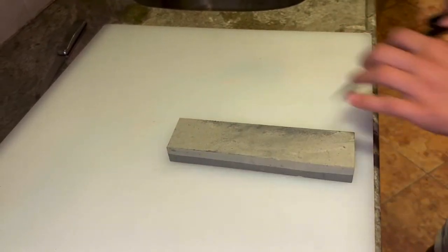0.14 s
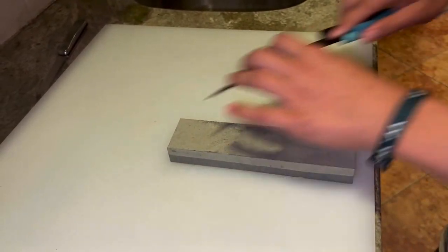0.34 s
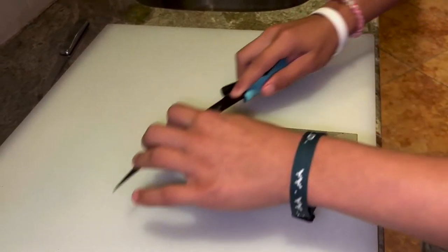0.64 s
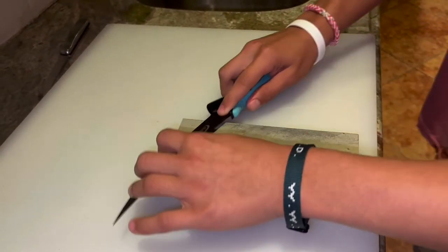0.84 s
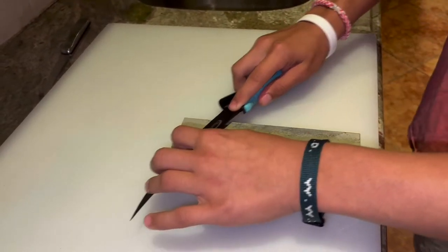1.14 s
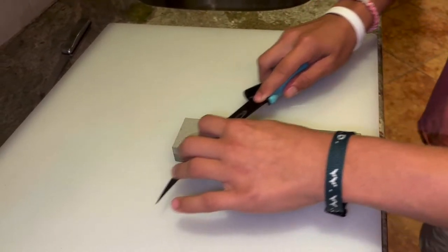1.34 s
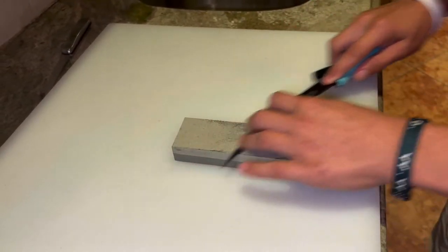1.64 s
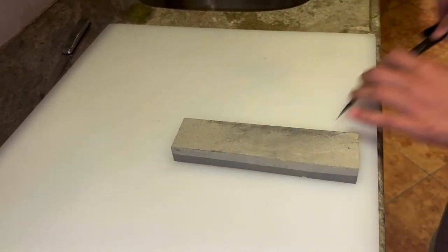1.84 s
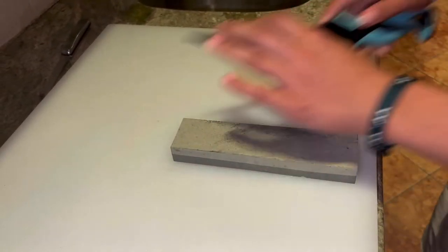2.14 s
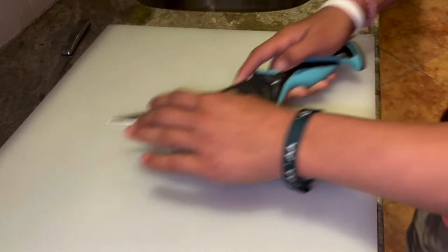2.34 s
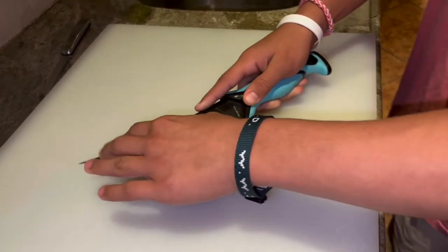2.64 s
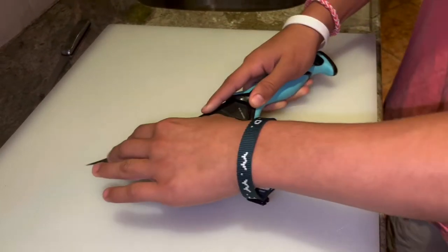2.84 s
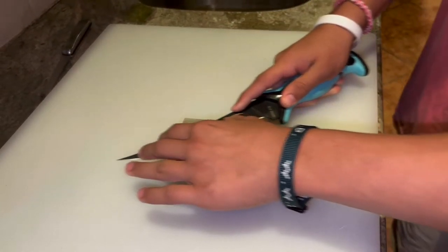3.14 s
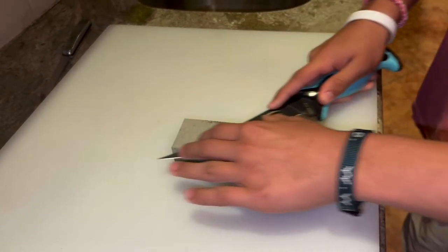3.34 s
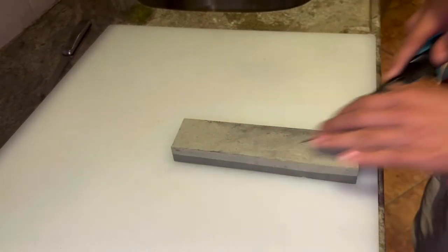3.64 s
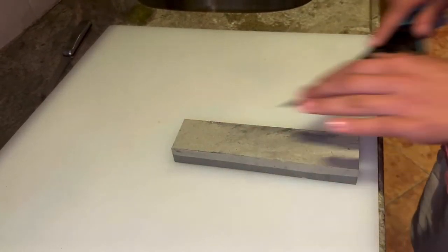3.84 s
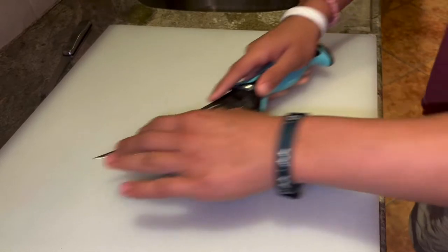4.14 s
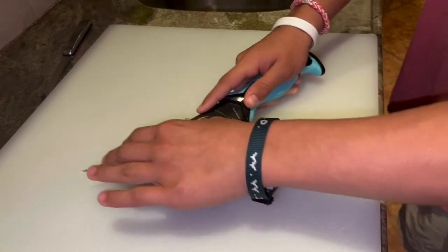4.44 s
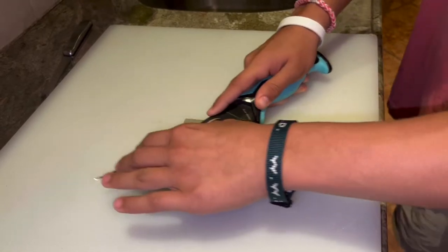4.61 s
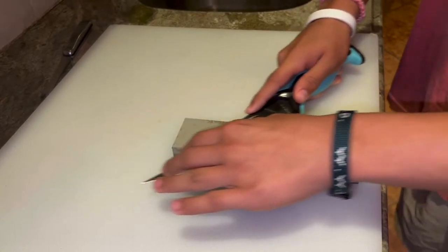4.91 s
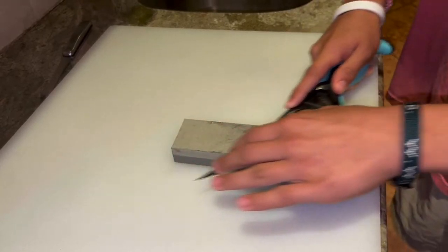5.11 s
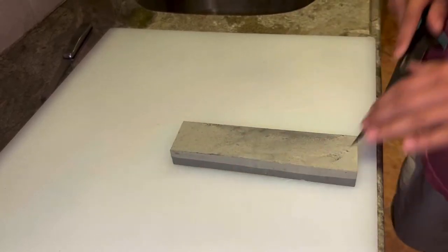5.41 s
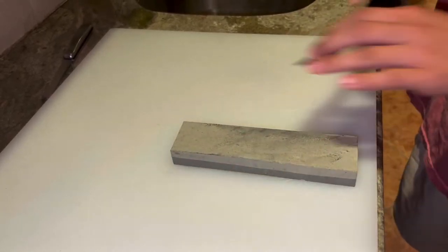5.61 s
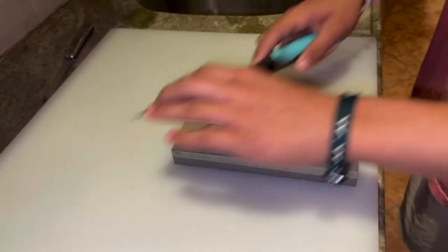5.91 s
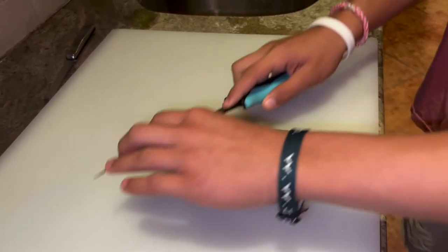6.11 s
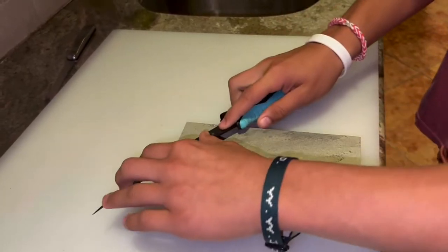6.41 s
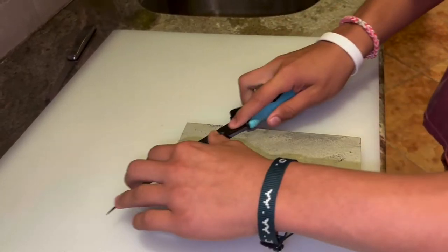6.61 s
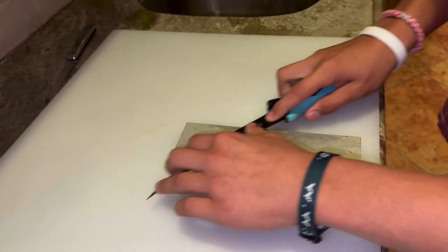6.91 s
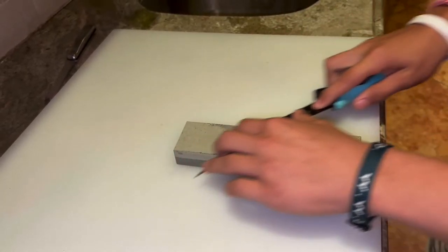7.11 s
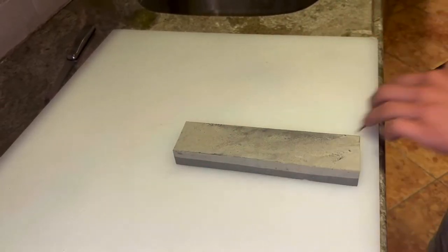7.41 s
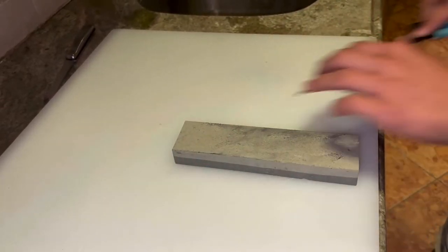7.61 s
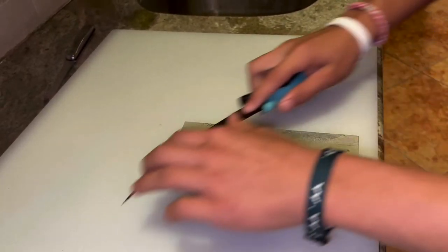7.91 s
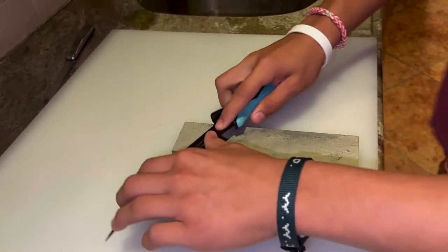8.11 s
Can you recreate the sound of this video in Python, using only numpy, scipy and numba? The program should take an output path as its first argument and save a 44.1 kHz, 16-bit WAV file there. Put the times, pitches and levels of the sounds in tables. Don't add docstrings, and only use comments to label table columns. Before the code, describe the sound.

In a small hard-walled kitchen, a knife is drawn along a sharpening stone, heard close up in stereo. Four bright, gritty scrapes of nearly a second each carry a thin steel ring that climbs in pitch, and most end in a sharp snap. Between them come pauses with faint blade ring, small clicks and cloth movement. A low duct throb and soft air hiss run underneath, and a fifth stroke starts with a strong knock.

```python
import sys
import numpy as np
from scipy import signal
from scipy.fft import rfft, irfft, next_fast_len
from scipy.io import wavfile
from scipy.ndimage import uniform_filter1d, map_coordinates
from numba import njit

SR = 44100
rng = np.random.default_rng(int(sys.argv[2]) if len(sys.argv) > 2 else 0)


def undo_db(level):
    steps = np.asarray(level, float) / 20
    return 10 ** steps


def pcm_store(signal):
    levels = np.round(np.clip(np.atleast_2d(signal), -1, 1) * 32767)
    wavfile.write(sys.argv[1], SR, levels.astype(np.int16).T)


N = 363869


def unit(x):
    return x / np.sqrt(np.mean(x ** 2) + 1e-20)


def along(points, hz):
    f, v = np.transpose(points)
    return np.interp(np.log(hz + 1), np.log(f + 1), v)


def curves(rows):
    s, *cols = np.transpose(rows)
    return [np.interp(np.arange(N) / SR, s, c) for c in cols]


def wobble(rate):
    knots = rng.standard_normal(int(N * rate / SR) + 4)
    return map_coordinates(knots, [np.arange(N) * rate / SR])


def filtered(x, response):
    m = next_fast_len(N + SR // 2)
    return irfft(rfft(x, m) * response(np.fft.rfftfreq(m, 1 / SR)), m)[..., :N]


def coloured(x, spectrum):
    return unit(filtered(x, lambda hz: undo_db(along(spectrum, hz))))


def ringing(x, modes):
    def response(f):
        total = 0
        for k, (centre, width, db) in enumerate(modes):
            damping = 1j * f * width
            total = total + (-1) ** k * undo_db(db) * damping / (centre * centre - f * f + damping)
        return total
    return filtered(x, response)


def spread(mid, side, alike, lead):
    def shares(hz):
        turn = np.arccos(np.clip(along(alike, hz), -1, 1)) / 2
        return np.array([np.cos(turn), np.sin(turn)])

    m, s = filtered(np.array([mid, side]), shares)
    return filtered(np.array([m + s, m - s]), lambda hz: np.exp(.5j * np.outer([1, -1], along(lead, hz))))


# time in seconds, level in dB.
THROB_LEVEL = [(0.0, -33), (0.04, -36.5), (1.63, -38), (1.75, -30.5), (1.86, -36), (2.87, -34), (3.28, -41),
               (3.49, -29), (3.65, -40), (3.77, -31.5), (4.05, -30.5), (5.4, -39.5), (5.54, -28),
               (5.68, -39.5), (6.9, -36), (7.7, -37.5), (8.04, -34.5), (8.25, -37.5)]
# frequency in Hz, strength in dB per Hz.
THROB = [(13, -56.5), (22, -21.5), (24, -15.5), (34, -10.5), (48, 9.5), (62, 10), (71, -2.5), (80, -3),
         (100, -38.5), (180, -120)]
RUMBLE = [(44, -29), (75, -11.5), (86, -5), (135, -4), (153, -12.5), (167, -17), (190, -23.5), (250, -67),
          (420, -120)]
VENT = [(100, -37), (170, -9.5), (242, -2), (275, -8), (305, -6), (382, -11.5), (414, -15), (488, -10),
        (1050, -23), (2380, -34), (2800, -39), (3640, -65), (6160, -120)]
CLOTH = [(1180, -25), (2000, -11), (2390, -2), (2510, -7.5), (3100, -5.5), (4570, -14), (4970, -12),
         (5790, -16), (8040, -14.5), (11800, -23.5), (15000, -28)]
# time in seconds, level in dB, fading in dB per second.
STIR = [(0.0, -65, 96), (.704, -81, 122), (1.8, -77.5, 7.5), (2.28, -86.5, 127), (2.39, -94, 149),
        (3.95, -73, 44), (5.4, -84, 17), (5.51, -81, 153), (5.72, -75, 36.5), (6.26, -88, 47),
        (7.4, -77, 16)]
# frequency in Hz, width in Hz, strength in dB.
WHINE = [(3200, 90, 0), (4900, 110, -3)]
# frequency in Hz, likeness from 0 to 1.
AIR_ALIKE = [(60, 0.2), (130, 0.93), (290, 0.93), (640, 0.4), (1410, 0.38), (3100, 0.21), (6820, 0.14),
             (15000, 0.12)]
# frequency in Hz, lead in radians.
AIR_LEAD = [(430, 0), (950, -1.2), (1640, 0), (4000, -.3), (5200, -1.3)]


def ventilation():
    noise = rng.standard_normal((6, N))
    hum_hz = 58.5 + 2.5 * wobble(4)
    hum = np.sqrt(2) * np.sin(2 * np.pi * np.cumsum(hum_hz) / SR)
    throb = undo_db(curves(THROB_LEVEL)[0]) * unit(coloured(noise[0], THROB) + undo_db(-2) * hum)
    rumble = undo_db(-41.5 + .8 * wobble(3.5)) * coloured(noise[1], RUMBLE)
    t = np.arange(N) / SR
    stir = undo_db(-80.5) + sum(undo_db(db - fade * np.abs(t - s)) for s, db, fade in STIR)
    pair = []
    for air, cloth in (noise[2:4], noise[4:]):
        rush = undo_db(-53.5 + 0.42 * wobble(1.8)) * coloured(air, VENT)
        pair.append(rush + stir * coloured(cloth, CLOTH))
    whine = ringing(ringing(rng.standard_normal(N), WHINE), WHINE)
    pair[0] = pair[0] + undo_db(-84.0) * unit(whine)
    left_db = 1.5
    balance = undo_db([[left_db / 2], [-left_db / 2]])
    return throb + rumble + balance * spread(*pair, AIR_ALIKE, AIR_LEAD)


# time in seconds, pitch in Hz, level in dB, seconds to die by 60 dB.
BUMPS = [
    (.71, 269, -26.5, 0.019),
    (4.409, 180, -37, 0.16),
    (4.408, 1113, -41, .03),
    (6.438, 220, -45.5, .06),
    (8.129, 140.7, -41, 0.074),
    (8.195, 192, -18, 0.039),
]
# time in seconds, pitch in Hz, level in dB, seconds to die by 60 dB.
HUMS = [(0, 4500, -64, 1.5), (1.65, 3350, -56, .6), (1.86, 4840, -73, .9), (3.57, 3400, -63, .7),
        (3.8, 2416, -70, 1.2), (3.93, 5000, -77, .5), (5.29, 3550, -63, .6), (5.5, 4880, -69, .5),
        (5.5, 9300, -72, .15), (5.68, 3300, -72, 1), (5.8, 4900, -76, 1)]


def lifted():
    out, t = np.zeros(N + SR), np.arange(SR // 2) / SR
    for s, hz, db, t60 in BUMPS + HUMS:
        drift = hz / 25000.0 * np.cumsum(rng.standard_normal(len(t)))
        swell = 1 - np.exp(-t / 0.0013)
        tone = np.sin(2 * np.pi * hz * t + drift)
        out[round(s * SR):][:len(t)] += undo_db(db - 60 * t / t60) * swell * tone
    return out[:N]


# time in seconds, peak in dB.
HANDLING = [(.341, -56.5), (4.295, -64), (7.684, -62), (5.565, -60.5), (6.3326, -49), (2.1096, -56.5),
            (2.2687, -55.5), (2.3292, -62), (2.387, -59), (5.4999, -61), (5.718, -61), (6.2625, -53.5),
            (6.3062, -73)]
# time in seconds, peak in dB, ring in Hz.
TOUCHES = [(0.7116, -41.5, 5690), (0.815, -62, 3600), (0.9894, -44, 7820), (4.3287, -38, 3600),
           (6.3445, -44.5, 3300), (6.366, -38.5, 3400), (6.3989, -43.5, 3245), (6.4154, -39, 5470),
           (6.4444, -33, 1780), (6.4862, -37.5, 9900), (8.0542, -34.5, 3610), (8.057, -30, 2150),
           (8.1081, -32, 3685), (8.1528, -29, 3600), (8.1672, -40, 5610), (8.1828, -23.5, 6625),
           (8.1937, -28, 3646)]
# time in seconds, peak in dB, ring in Hz.
SNAPS = [(0.926, -36, 7520), (1.428, -18.5, 9160), (1.4278, -20, 8050), (1.174, -27, 4620),
         (1.3284, -25, 7780), (1.491, -28.5, 9210), (1.6427, -6.5, 10890), (1.6465, -12.5, 14100),
         (2.6678, -34.5, 11590), (3.3396, -24.5, 8000), (4.6366, -28.5, 7226), (5.005, -21.5, 9980),
         (6.6868, -26, 10650), (6.866, -26, 10000), (7.071, -27.5, 10220), (2.636, -34, 4420),
         (2.6468, -25.5, 4250), (2.6812, -25.5, 8650), (2.6862, -20.5, 4634), (4.3416, -46, 4150),
         (4.393, -47, 2800), (6.746, -23, 8240), (1.618, -21, 4542), (2.7188, -14.5, 6420),
         (2.7205, -20.5, 10600), (2.8052, -18, 6200), (3.272, -20.5, 6690), (3.284, -24.5, 3600),
         (3.5596, -39, 3300), (4.408, -22, 3480), (4.5426, -28, 3180), (4.8789, -20, 6820),
         (4.949, -15.5, 7630), (4.969, -25.5, 7290), (5.032, -16, 8240), (5.27, -34.5, 9470),
         (6.715, -19, 8240), (7.2245, -12, 5300), (7.2262, -10, 6310), (7.2265, -16, 14300),
         (8.132, -23.5, 3620)]


def contacts():
    snaps = [(*row, -36.5) for row in SNAPS]
    touches = [(*row, -0.5) for row in TOUCHES]
    return snaps + touches + [(*row, 3430, -15.5) for row in HANDLING]


# pitch in Hz, strength in dB, seconds to die by 60 dB.
CHORD = [(1740, -12, 0.041), (2438, -6.5, 0.028), (2780, -10.5, 0.043), (3480, -5, 0.03),
         (4150, -9.5, 0.082), (5550, -7.5, 0.062), (6390, -4, 0.045), (8860, -9, .04)]
# pitch in Hz, strength in dB.
KNOCK = [(720, -6), (980, -1.5), (1350, -6.5)]


def ticks():
    out, t = np.zeros(N + SR), np.arange(SR // 10) / SR

    def tone(hz, shake, noise):
        return np.sin(2 * np.pi * hz * t + shake * np.cumsum(noise))

    for s, db, hz, knock_db in contacts():
        noise = rng.standard_normal((3, len(t)))
        dull = np.clip(.35 - (db + 12.5) / 55, 0, 1)
        swell = 1 - np.exp(-t / 0.00052)
        burst = noise[0] - np.clip(.6 - dull, 0, 1) * np.roll(noise[0], 1)
        fading = undo_db(-4.5 - 60 * t / 0.011) + undo_db(-24.0 - 60 * t / 0.11)
        crack = fading * signal.lfilter([1, 0, -1], [1, -dull, .15], burst)
        chord = 0
        for (f, share_db, t60), scatter in zip(CHORD, noise[1]):
            note_db = -32 + 28 * min(dull, .7) + share_db + 1.5 * scatter
            chord = chord + undo_db(note_db - 60 * t / t60) * tone(f, 0.072, noise[2])
        steel = undo_db(-6 - 60 * t / .025) * tone(hz, .12, noise[2])
        stone = sum(undo_db(share_db) * tone(f, 0.087, noise[1]) for f, share_db in KNOCK)
        knock = undo_db(knock_db - 60 * t / 0.031) * stone
        blow = undo_db(db - 4.5) * swell * (crack + steel + chord + knock)
        out[round(s * SR):][:len(t)] += blow
        out[round((s + .0035) * SR):][:len(t)] += undo_db(-8.5) * blow
    return out[:N]


def grit(flutter_db):
    sizes = undo_db(1.5 * rng.exponential(size=N))
    flutter = undo_db(flutter_db * (wobble(30) + wobble(110)))
    return unit(sizes * flutter * rng.standard_normal(N))


def patchy(x, patchy_db):
    z = signal.stft(x, nperseg=512)[2]
    field = uniform_filter1d(rng.standard_normal(z.shape), size=2, axis=0)
    field = uniform_filter1d(field, size=9, axis=1)
    return unit(signal.istft(z * undo_db(patchy_db * unit(field)), nperseg=512)[1][:N])


def window(rows, rise, fall):
    t = np.arange(N) / SR
    return np.clip((t - rows[0][0]) / rise, 0, 1) * np.clip((rows[-1][0] - t) / fall, 0, 1)


@njit
def glide(x, turn, keep):
    y = np.zeros(len(x))
    for i in range(2, len(x)):
        y[i] = x[i] - x[i - 2] + 2 * keep * np.cos(turn[i]) * y[i - 1] - keep * keep * y[i - 2]
    return y


# time in seconds, pitch in Hz, share in dB.
FREE_BLADE = [
    [(1.15, 4600, -9.5), (1.195, 4700, -1.5), (1.205, 5390, 1.5), (1.27, 5600, -3.5), (1.32, 6200, -3),
     (1.335, 7920, 4.5), (1.4, 8000, -1), (1.5, 8250, -2), (1.56, 9300, -3)],
    [(2.72, 6400, -4.5), (2.82, 6130, -1), (2.9, 5720, -7.5), (3.02, 5950, -2.5), (3.12, 6260, -1),
     (3.22, 6770, -6), (3.31, 7160, -2), (3.35, 8100, -0.5), (3.4, 10300, -1.5)],
    [(4.54, 5500, 0), (4.62, 5270, -1.5), (4.74, 5890, 1), (4.81, 6120, -5.5), (4.83, 6300, -14),
     (4.87, 6850, 1), (4.98, 7300, -1.5), (5.05, 8250, 0), (5.11, 9900, -5)],
    [(6.5, 4700, -7), (6.62, 5020, 0), (6.7, 4900, -5), (6.78, 5270, -7.5), (6.88, 5500, -5.5),
     (6.98, 5300, -16), (7.08, 5650, -5), (7.13, 5840, -8.5)],
]
# start in seconds, end in seconds, first pitch in Hz, last pitch in Hz, share in dB.
GRIPS = [(0.875, 1.062, 7400, 7860, -0.5), (1.029, 1.092, 6560, 6700, -1.5),
         (1.148, 1.21, 6250, 6085, -5.5), (1.33, 1.39, 8970, 8620, 0.5), (1.029, 1.123, 4900, 5280, -6),
         (1.475, 1.535, 9130, 9450, 3), (1.536, 1.61, 10670, 10700, -2), (1.564, 1.63, 7500, 7700, -2),
         (1.571, 1.59, 6750, 6700, -3), (1.604, 1.635, 4550, 4550, -0.5), (2.636, 2.701, 4360, 4650, -2.5),
         (2.746, 3.269, 7700, 7640, -8.5), (2.901, 3.303, 8850, 9100, -6.5),
         (3.327, 3.422, 10150, 10700, -1.5), (3.4, 3.465, 7600, 8800, -2), (3.44, 3.519, 9730, 9800, -5),
         (4.41, 4.464, 4240, 4150, 1.5), (4.335, 4.36, 4150, 4150, 3), (4.5, 4.535, 6000, 6150, 2),
         (4.48, 4.535, 8800, 8700, -4.5), (4.536, 4.575, 4750, 4900, 2), (4.549, 4.619, 7860, 7800, -5),
         (3.409, 3.46, 4350, 4780, -10.5), (3.34, 3.38, 4670, 4900, -5), (4.626, 4.715, 7200, 6800, 1),
         (4.68, 4.828, 7650, 8080, -1.5), (4.85, 5.058, 4550, 4850, -12.5), (4.9, 5.028, 9290, 9640, -4),
         (4.981, 5.1, 10700, 10880, -8.5), (5.08, 5.16, 7060, 7600, -5), (5.1, 5.166, 9000, 9300, -7),
         (6.319, 6.56, 7650, 7430, -4), (6.558, 6.706, 7770, 8000, -0.5), (6.715, 6.769, 8050, 8090, 1),
         (6.408, 6.701, 5380, 7340, -4.5), (6.41, 6.467, 8640, 8950, -0.5),
         (6.948, 7.101, 10460, 10400, -7), (6.917, 7.053, 7150, 7380, -9.5),
         (7.141, 7.219, 4760, 4500, -11.5), (8.056, 8.098, 6540, 6480, 9.5), (8.111, 8.236, 6550, 6660, 0),
         (8.122, 8.207, 5550, 5530, 0.5), (8.166, 8.2, 8500, 8500, -2.5)]
# start in seconds, end in seconds, first pitch in Hz, last pitch in Hz, share in dB.
SINGS = [(0.862, 1.049, 3500, 3550, -10), (1.299, 1.381, 3050, 3070, -12), (1.558, 1.648, 3360, 3400, -5.5),
         (2.78, 3.43, 3550, 3480, -4), (3.151, 3.414, 3330, 3360, -6.5), (2.86, 2.998, 3250, 3230, -7.5),
         (3, 3.25, 3800, 3800, -7.5), (2.76, 3.1, 2900, 2720, -9), (2.763, 2.92, 2360, 2435, -14.5),
         (4.407, 4.543, 3480, 3420, -15), (4.409, 4.623, 2430, 2390, -7.5), (4.548, 4.818, 3360, 3200, -7),
         (4.62, 5.16, 3530, 3440, -2), (4.56, 4.74, 2700, 2780, -10.5), (4.739, 4.796, 2280, 2270, -4.5),
         (4.949, 5.142, 2210, 2740, -9), (8.052, 8.106, 3570, 3600, 0), (8.107, 8.215, 3600, 3600, -11.5),
         (8.169, 8.199, 2400, 2380, -3), (0.899, 1.049, 1740, 1780, -6.5), (1.041, 1.102, 1850, 1750, -1),
         (1.578, 1.647, 1770, 1890, -8), (2.636, 2.701, 1800, 1770, -5), (2.721, 3.097, 1755, 1705, -13),
         (3.433, 3.563, 3550, 3400, -5), (3.401, 3.52, 2500, 2300, -9), (4.332, 4.403, 2380, 2400, -3.5),
         (4.36, 4.402, 2800, 2800, -8), (4.428, 4.538, 2770, 2780, -15.5), (4.554, 4.62, 3900, 3950, -0.5),
         (4.499, 4.78, 1750, 1780, -9.5), (6.41, 6.505, 2280, 2180, -6), (6.419, 6.497, 1750, 1727, -3),
         (6.6, 6.703, 3280, 2600, -11.5), (6.71, 6.814, 2690, 3200, -5), (7.129, 7.22, 1750, 1780, -12),
         (7.172, 7.226, 2340, 2460, -3.5), (7.15, 7.226, 3530, 3610, -5), (1.52, 1.64, 850, 850, -13.5),
         (3.289, 3.458, 840, 840, -11.5), (4.98, 5.208, 850, 850, -15.5)]


def slides():
    return FREE_BLADE + [[(s0, hz0, db), (s1, hz1, db)] for s0, s1, hz0, hz1, db in GRIPS + SINGS]


def song():
    out = np.zeros((2, N))
    stray, catch = wobble(25), wobble(14) + 0.79 * wobble(45)
    for rows in slides():
        on = np.arange(round(rows[0][0] * SR), min(N, round(rows[-1][0] * SR)))
        s, hz, db = np.transpose(rows)
        t = on / SR
        own = (on + rng.integers(N)) % N
        pitch_hz = np.interp(t, s, hz) * (1 + .006 * stray[own])
        keep = np.exp(-np.pi * (15 + .033 * hz.mean()) / SR)
        ring = unit(glide(rng.standard_normal(len(on)), 2 * np.pi * pitch_hz / SR, keep))
        ends = np.clip((t - s[0]) / 0.02, 0, 1) * np.clip((s[-1] - t) / .02, 0, 1)
        level_db = np.interp(t, s, db) + 1.2 * catch[own]
        out[int(hz.mean() > 4000), on] += ends * undo_db(level_db) * ring
    return out


# time in seconds, edge noise (speed) in dB, stone noise (weight) in dB.
DRAWS = [
    [(0.926, -59.5, -61.5), (1.122, -44, -51), (1.174, -38.5, -48.5), (1.35, -36.5, -48.5),
     (1.42, -41.5, -51.5), (1.5, -35.5, -50), (1.56, -37, -48), (1.62, -31.5, -43), (1.647, -30, -45)],
    [(2.72, -30.5, -46.5), (2.746, -50, -52), (2.794, -39.5, -47.5), (3.11, -49, -50), (3.27, -42.5, -48.5),
     (3.454, -36.5, -49.5), (3.56, -45, -54), (3.57, -63.5, -50)],
    [(4.54, -47, -48), (4.646, -42, -49.5), (4.81, -43, -48), (5.082, -34, -45.5), (5.19, -38, -49),
     (5.276, -39.5, -47), (5.29, -66.5, -53)],
    [(6.416, -54, -52), (6.5, -48.5, -50.5), (6.68, -45, -47), (6.7, -36, -47), (6.75, -38, -49.5),
     (6.8, -37.5, -48), (7.056, -38, -54), (7.174, -36.5, -48), (7.227, -29, -38.5)],
    [(8.166, -49.5, -45.5), (8.184, -38, -36), (8.251, -67, -62)],
]
# start in seconds, end in seconds, edge level at start in dB, edge level at end in dB, weight in dB.
LANDINGS = [
    (0.854, 0.933, -78, -63.5, -66.5),
    (2.635, 2.714, -53.5, -43, -50.5),
    (4.331, 4.405, -71, -74, -59.5),
    (4.41, 4.544, -63.5, -55, -49),
    (1.648, 1.69, -41.5, -54.5, -53.5),
    (5.29, 5.34, -64, -73, -58.5),
    (7.228, 7.27, -41.5, -57.5, -48.5),
    (6.342, 6.423, -77, -78, -59),
    (8.052, 8.108, -59.5, -59, -52.5),
    (8.108, 8.165, -51, -53, -46),
]


def strokes():
    return DRAWS + [[(s0, db0, weight), (s1, db1, weight)] for s0, s1, db0, db1, weight in LANDINGS]


# frequency in Hz, strength in dB per Hz.
GRIT = [(2060, -42), (3500, -14), (4090, -2.5), (6500, 2.5), (8030, 5), (10600, 4.5), (12300, -13),
        (15600, -34.5), (22000, -120)]
FINE = [(8000, -42.5), (11000, -6.5), (11700, -4.5), (12350, -18), (13100, 3), (15300, 5.5), (16000, -8)]
BOARD = [(530, -46.5), (900, -7), (1510, -12), (1750, -10), (3050, -6), (3440, -5.5), (4500, -14.5),
         (5850, -32.5), (9900, -120)]
PUSH = [(100, -64.5), (170, 5.5), (300, 1), (500, -15.5), (850, -12), (1100, -16), (2000, -80.5)]
# frequency in Hz, width in Hz, strength in dB.
BLADE = [(4740, 190, -5.5), (7860, 33, -3), (9300, 190, -2.5), (10700, 380, 11)]
STONE = [(276, 160, -0.5), (850, 390, -4), (1750, 68, -19), (2540, 25, 5), (2714, 36, -6), (3480, 21, 9.5)]


def scrape():
    rub, shake = grit(flutter_db=.9), grit(flutter_db=.9)
    low_song, high_song = song()
    hiss = patchy(coloured(rub, GRIT) + undo_db(-4.0) * unit(ringing(rub, BLADE)), patchy_db=4.3)
    upper = undo_db(-0.5) * hiss + undo_db(0.5) * high_song
    fine = patchy(coloured(grit(flutter_db=1.2), FINE), patchy_db=3.5)
    body = patchy(coloured(shake, BOARD) + undo_db(-3) * unit(ringing(shake, STONE)), patchy_db=2.4)
    body = body + undo_db(3) * low_song
    push = patchy(coloured(grit(flutter_db=.8), PUSH), patchy_db=1.5)
    t, sound = np.arange(N) / SR, np.zeros(N)
    for k, rows in enumerate(strokes()):
        level_db, body_db = curves(rows)
        fine_db = -47.5 + (level_db + 39.5)
        leaving = np.clip(1 - (rows[-1][0] - t) / 0.15, 0, 1) * (k < len(DRAWS))
        push_db = -55 + 0.32 * (body_db + 51.0) - 10 * leaving
        edge = undo_db(level_db) * upper + undo_db(fine_db) * fine
        below = undo_db(body_db) * body + undo_db(push_db) * push
        sound += window(rows, 0.0014, 0.0018) * (edge + below)
    return sound


# frequency in Hz, seconds to die by 60 dB.
KITCHEN = [(300, 0.35), (2000, .42), (6000, 0.38), (12000, 0.2)]


def kitchen(x):
    out, hop = np.zeros((2, N + SR)), SR // 8
    for start in range(0, N, hop):
        hz, t, z = signal.stft(rng.standard_normal((2, SR // 2)), SR, nperseg=256)
        fading = undo_db(-60 * t / along(KITCHEN, hz)[:, None])
        tail = signal.istft(z * fading, SR, nperseg=256)[1]
        answer = signal.fftconvolve(x[None, start:start + hop], tail / np.linalg.norm(tail[0]), axes=1)
        out[:, start + 200:][:, :answer.shape[1]] += answer
    return out[:, :N]


def hollowed(pair):
    z = signal.stft(pair, nperseg=1024)[2]
    field = uniform_filter1d(rng.standard_normal(z.shape[1:]), size=2, axis=0)
    field = unit(uniform_filter1d(field, size=6, axis=1))
    dips = undo_db(-4.5 * np.clip(field - .5, 0, 3) ** 2)
    return signal.istft(z * dips, nperseg=1024)[1][:, :N]


# frequency in Hz, likeness from 0 to 1.
KNIFE_ALIKE = [(300, .97), (1400, .95), (2600, .6), (7000, .8), (15000, .6)]
ROOM_ALIKE = [(300, 1), (1400, 1), (3000, 0.22), (6000, 0.402)]
# frequency in Hz, lead in radians.
KNIFE_LEAD = [(600, -.3), (1600, 0), (4200, 0), (5400, -1), (7200, -1.3), (13000, -1.3), (15600, -1.7)]


def knife():
    x = lifted() + ticks() + scrape()
    z = signal.stft(x, nperseg=128)[2]
    paths = uniform_filter1d(rng.standard_normal(z.shape), size=30, axis=1)
    bounced = signal.istft(z * np.exp(1j * np.pi * unit(paths)), nperseg=128)[1][:N]
    near = spread(x, bounced, KNIFE_ALIKE, KNIFE_LEAD)
    room = spread(*kitchen(x), ROOM_ALIKE, KNIFE_LEAD)
    return hollowed(undo_db(0.5) * near + undo_db(-9.0) * room)


def scene():
    return ventilation() + knife()


def top_cut(x):
    return signal.sosfilt(signal.butter(12, 16640, fs=SR, output="sos"), x)


def record(dry):
    mix = filtered(dry, lambda hz: (hz < 16000) / (1 + (36 / (hz + 1)) ** 4))
    return top_cut(mix)


dry = scene()
out = record(dry)
pcm_store(out)
```